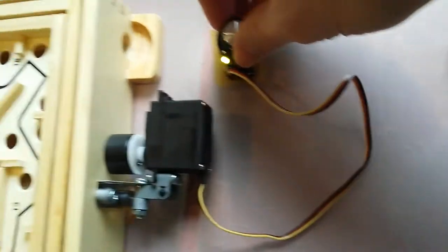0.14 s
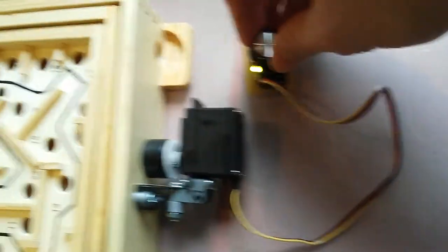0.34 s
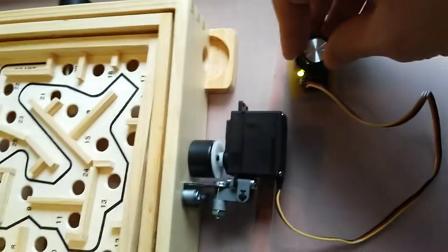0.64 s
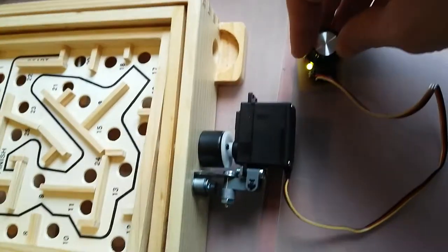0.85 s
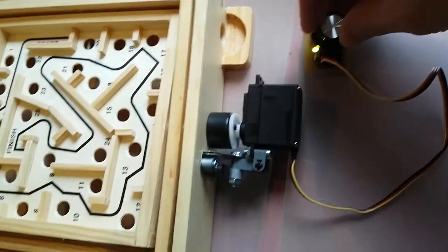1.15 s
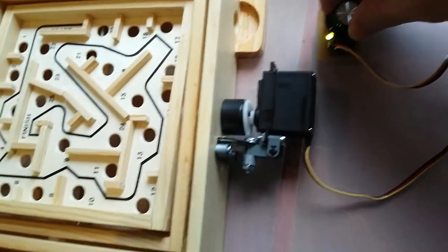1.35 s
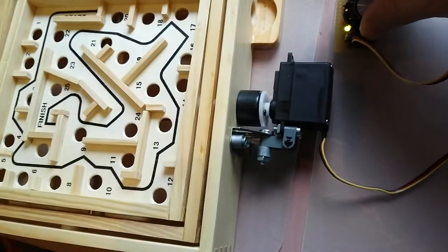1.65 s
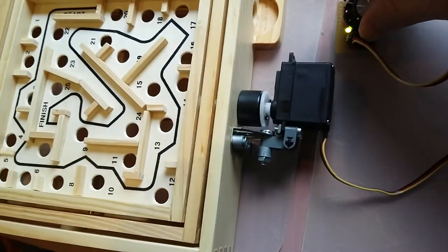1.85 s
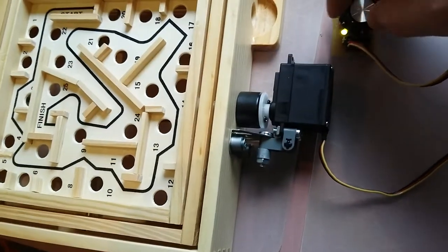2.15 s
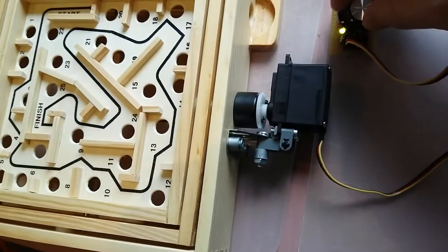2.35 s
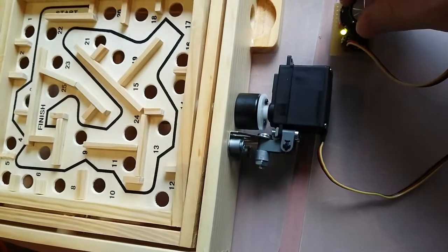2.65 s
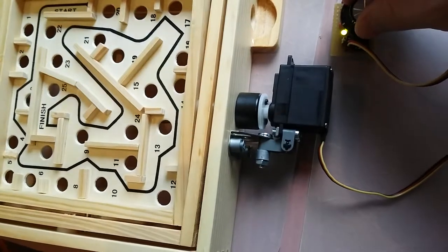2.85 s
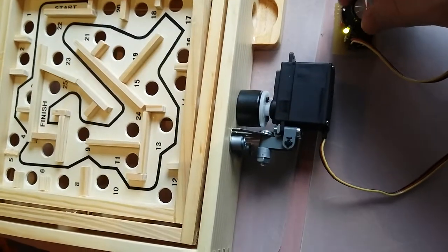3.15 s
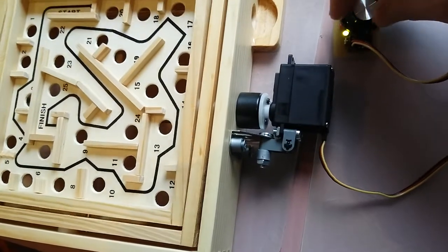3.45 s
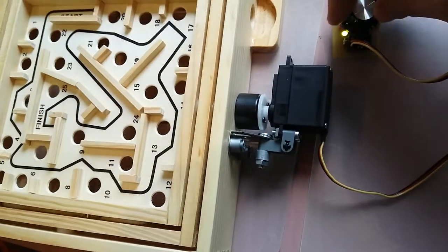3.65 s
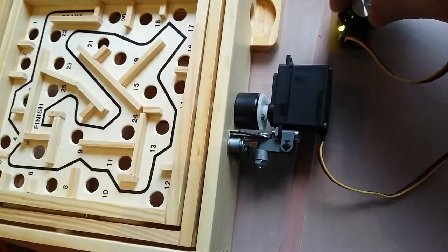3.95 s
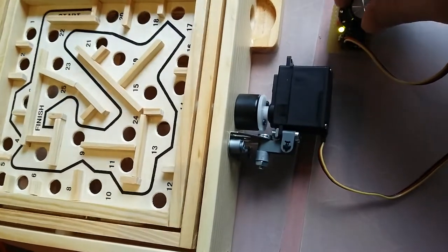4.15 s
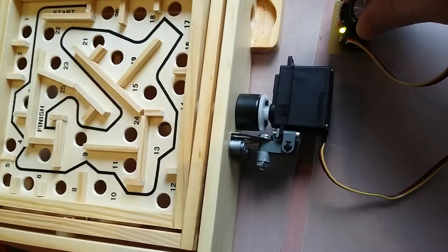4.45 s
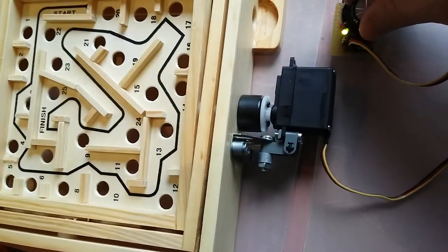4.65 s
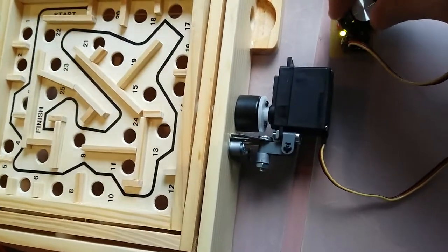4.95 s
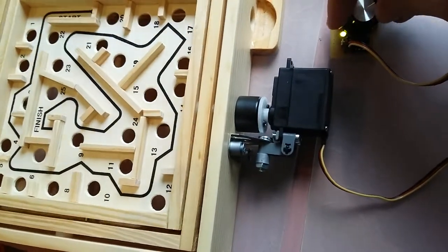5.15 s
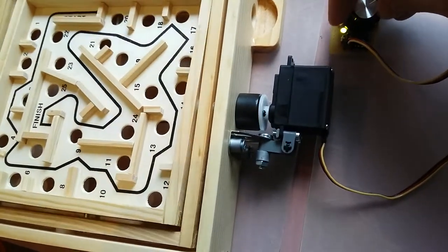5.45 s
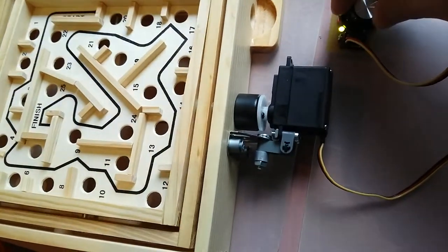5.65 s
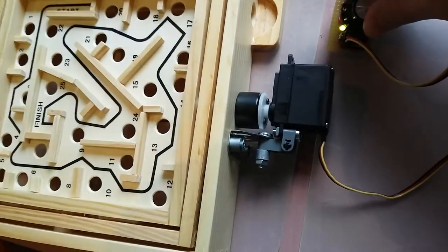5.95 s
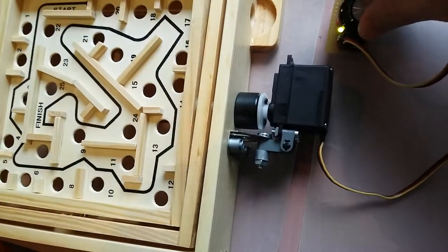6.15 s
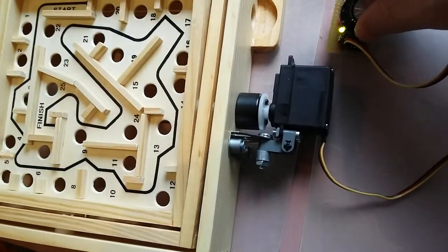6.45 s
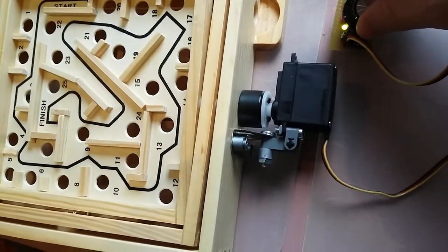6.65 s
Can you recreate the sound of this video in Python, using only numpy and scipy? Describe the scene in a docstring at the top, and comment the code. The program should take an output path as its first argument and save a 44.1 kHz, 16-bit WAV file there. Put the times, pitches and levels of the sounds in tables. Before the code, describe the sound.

Buzzy little motor gears whirr back and forth in brief swings, pausing, then growing busier and higher, ending in a scatter of small rattling twitches.

```python
"""A small geared servo tilts a wooden maze board to and fro as a hand turns its control knob, in a quiet room.
Its first gear pair whines at the tooth rate, loose teeth rattle in the plastic case, and fast gears hiss.
The drive pushes about fifty-one times a second, so the speed surges and the rougher sound throbs.
Short bursts of rattle are nudges as the servo hunts for its place. The board knocks softly on its frame
twice, ringing in low decaying tones. Filtered noise makes the room tone, and random echoes the room."""
import sys
import numpy as np
from scipy import signal
from scipy.fft import rfft, irfft, next_fast_len
from scipy.io import wavfile
from scipy.ndimage import uniform_filter1d

SR = 44100
rng = np.random.default_rng(int(sys.argv[2]) if len(sys.argv) > 2 else 0)


def wav_record(signal):
    """Record a signal, one row per channel, as 16-bit PCM in the file named by sys.argv[1]."""
    frames = np.transpose(np.atleast_2d(signal))
    bounded = np.clip(frames, -1, 1)
    # unit amplitude maps onto the largest positive 16-bit level
    quanta = np.round(bounded * 32767).astype(np.int16)
    wavfile.write(sys.argv[1], SR, quanta)


N = 299871  # length in samples
EDGE_HZ = 15680  # top of the recorded band


def gain_of(db):
    """Turns decibels into a gain."""
    return 10 ** (np.asarray(db) / 20)


def evened(x):
    """Scales to an rms (average strength) of 1."""
    return x / np.sqrt(np.mean(x ** 2) + 1e-20)


def read(points, hz):
    """Reads a table between its rows, along a logarithmic frequency axis."""
    f, value = np.transpose(points)
    return np.interp(np.log(hz + 1), np.log(f + 1), value)


def add(mix, s, sound):
    """Mixes a sound in at s seconds, cutting off what runs past the end."""
    part = mix[round(s * SR):][:len(sound)]
    part += sound[:len(part)]


def drift(length, hz):
    """Random wandering with an rms of about 1, no faster than about hz."""
    noise = rng.standard_normal(length + 4096)
    slow = signal.lfilter(*signal.butter(2, hz, fs=SR), noise)
    return evened(slow)[4096:]  # skip the start of the filter


def case_db(hz):
    """Each resonance of case and bracket lifts the colour around its own frequency."""
    # Each row: frequency in Hz, width in Hz, lift in dB before any weighting.
    resonances = [(1090, 63, 0.5), (1620, 104, 5), (2337, 108, 11), (2897, 206, 11.5), (3983, 155, 6),
                  (4876, 246, 10), (5235, 244, 10), (5720, 360, 0.5), (6920, 420, 6.5), (9140, 1400, 3.5),
                  (13050, 660, 12)]
    return sum(db / (1 + (2 * (hz - f) / width) ** 2) for f, width, db in resonances)


def ring_of(colour):
    """How the case rings after one tooth tap of a given colour: nothing sounds before the tap."""
    hz = abs(np.fft.fftfreq(8192, 1 / SR))
    log_gain = np.log(gain_of(np.maximum(read(colour, hz) + case_db(hz), -100)))
    phase = -signal.hilbert(log_gain).imag  # minimum phase: the energy comes as early as it can
    ring = np.fft.ifft(np.exp(log_gain + 1j * phase)).real[:2048]
    return ring / np.linalg.norm(ring)


def taps(length):
    """Loose teeth strike densely at random, some harder, in clumps."""
    harder = np.minimum(rng.exponential(1, length), 5)
    size = gain_of(1.8 * harder + 1.4 * drift(length, 120))
    struck = rng.random(length) < 14000 / SR  # about 14000 taps a second
    return evened(size * struck * rng.choice([-1., 1.], length))


def evenness(t):
    """Clean share and speed surge: rough running, easing into each steady stretch and out of it."""
    # Stretches where the gears settle. Each row: start in seconds, end in seconds,
    # clean share from 0 to 1, surge of speed in each push as a share.
    steady = [(.44, .56, .55, .05), (.63, .83, .74, .014), (1.56, 1.84, .68, .045), (2.58, 2.95, .5, .04),
              (3.58, 3.7, .66, .02), (3.76, 3.84, .8, .008), (4.06, 4.15, .45, .05), (4.24, 4.3, .6, .03),
              (4.4, 4.48, .52, .035), (5.17, 5.6, .85, .004), (5.82, 6.08, .7, .009)]
    rough_clean, rough_surge, settle_s = .18, .045, .08
    a, b, clean, surge = np.transpose(steady)[:, :, None]
    settled = np.clip(np.minimum(t - a, b - t) / settle_s + 1, 0, 1)
    settled = settled / np.maximum(settled.sum(0), 1)  # shares where stretches overlap
    clean_now = rough_clean + (settled * (clean - rough_clean)).sum(0)
    surge_now = rough_surge + (settled * (surge - rough_surge)).sum(0)
    return clean_now, surge_now


def tooth_whine(hz, turns, surge):
    """Harmonics of the tooth rate: each flutters, and beats once a turn of the uneven pinion."""
    # Starting strength of harmonics 1 to 9, in dB.
    tooth_shape_db = [2, 1, 1.5, 0, 5.5, 5, -3, 1.5, -9.5]
    # Colour of the whine. Each row: frequency in Hz, amount added to a harmonic there in dB.
    whine_colour = [(700, -17.5), (1050, -9), (1550, 0), (2050, -7), (2880, -1), (3350, -6.5), (4000, 2.5),
                    (5100, 4.5), (6000, -6), (7500, -11), (12000, -17)]
    pinion_teeth = 10
    shaft = 2 * np.pi * turns / pinion_teeth
    whine = np.zeros(len(hz))
    for k, shape_db in enumerate(tooth_shape_db, start=1):
        flutter_db = (2.5 + 15 * surge) * drift(len(hz), 50)
        db = shape_db + read(whine_colour, k * hz) + 0.73 * case_db(k * hz) + flutter_db
        db -= 22.0 * k * surge  # uneven running weakens the upper harmonics most
        beat = 1 + 0.28 * np.cos(shaft + 2 * np.pi * rng.random())
        tone = np.cos(2 * np.pi * (k * turns + rng.random()))
        whine += gain_of(db) * beat * (k * hz < EDGE_HZ) * tone
    return whine / np.sqrt(uniform_filter1d(whine ** 2, 4000) + 1e-20)  # keep the strength near 1


def later_gears(hz, turns):
    """Slower gear meshes hum where they cross a resonance of the bracket."""
    # Each row: multiple of the tooth rate, level in dB before its random flutter,
    # resonance in Hz, width in Hz.
    slow_meshes = [(.31, -22, 458, 124), (.69, -13, 1250, 114)]
    hum = np.zeros(len(hz))
    for multiple, db, peak_hz, width in slow_meshes:
        near = 1 / (1 + (2 * (multiple * hz - peak_hz) / width) ** 2)
        flutter_db = 5.0 * drift(len(hz), 68)
        hum += near * gain_of(db + flutter_db) * np.cos(2 * np.pi * multiple * turns)
    return hum


def swing(rows, usual_hiss_db, rattle_ring, hiss_ring):
    """One tilt: whine, rattle and hiss follow the tooth rate and throb with the pushes of the drive."""
    pushes_per_s, usual_hz = 50.9, 1200
    hiss_db_per_octave, hiss_per_db = 14.5, 0.68  # hiss grows with speed and with loudness
    s, *columns = np.transpose(rows)
    t = np.arange(s[0], s[-1], 1 / SR)
    rate_hz, level_db = (np.interp(t, s, c) for c in columns)
    clean, surge = evenness(t)

    pushes = pushes_per_s * t + 0.633
    number = (pushes // 1 - pushes[0] // 1).astype(int)
    strength = rng.standard_normal(number[-1] + 1)[number]  # no two pushes are alike
    # Speed climbs in each push, then sags.
    climb = uniform_filter1d(2 * (pushes % 1) - 1 + .5 * strength, 60)
    hz = rate_hz * (1 + surge * climb + .003 * drift(len(t), 300))
    turns = np.cumsum(hz) / SR  # counts teeth passed

    whine = tooth_whine(hz, turns, surge) + later_gears(hz, turns)
    gate = 1 + 0.47 * np.cos(2 * np.pi * turns)  # taps are stronger where teeth meet
    rattle = signal.oaconvolve(taps(len(t)) * gate, rattle_ring)[:len(t)]
    hiss = signal.oaconvolve(taps(len(t)) * gate, hiss_ring)[:len(t)]
    hiss_db = usual_hiss_db + hiss_db_per_octave * np.log2(rate_hz / usual_hz)
    hiss_db += hiss_per_db * (level_db - max(level_db))
    gears = np.sqrt(clean) * whine + np.sqrt(1 - clean) * rattle + gain_of(hiss_db) * hiss

    throb_db = 2.4 * (1 - clean) * np.cos(2 * np.pi * (pushes - .55))
    edge = np.clip(np.minimum(t - t[0], t[-1] - t) / 0.0033, 0, 1)  # short fades at both ends
    return s[0], gain_of(level_db + throb_db) * gears * edge


def ports(x, depth):
    """The two microphone ports hear the servo with their own delay and shading."""
    # Each row: frequency in Hz, radians by which left leads.
    lead = [(1000, 1), (2400, 0.99), (2800, -2), (3200, -2), (3500, 1.5), (4100, 0.5), (4600, -1.5),
            (5000, -2.5), (5900, -7), (6300, -0.5), (8600, -9), (9600, 1.14)]
    # Each row: frequency in Hz, left minus right in dB before scaling by depth.
    lean = [(1000, 3.5), (2300, -2), (2900, -10.5), (3500, -8.5), (4300, -2), (4900, 10.5), (5500, 16),
            (6200, 10.5), (7600, 4.5), (9600, 0), (13000, -3.5)]
    size = next_fast_len(N + 4096)
    hz = np.fft.rfftfreq(size, 1 / SR)
    half = gain_of(depth * read(lean, hz) / 2) * np.exp(.5j * read(lead, hz))
    return irfft(rfft(x, size) * np.array([half, 1 / half]), size)[:, :N]


def room(x):
    """Sparse echoes of random sign, each band dying at its own speed, unlike at the two ports."""
    # Each row: frequency in Hz, time to fade by 60 dB in seconds.
    fade_times = [(500, 0.46), (4000, .13), (10000, 0.22)]
    sparse = np.zeros((2, SR // 2))
    starts = np.arange(150, SR // 2 - 20, 20)
    at = starts + rng.integers(0, 20, (2, len(starts)))
    np.put_along_axis(sparse, at, rng.choice([-1., 1.], at.shape), 1)
    hz, t, z = signal.stft(sparse, SR, nperseg=256)
    fade = gain_of(-60 * t / read(fade_times, hz)[:, None])
    tail = signal.istft(z * fade, SR, nperseg=256)[1]
    return signal.fftconvolve(x[None], tail / np.linalg.norm(tail[0]), axes=1)[:, :N]


def air():
    """Room tone: random short-time spectra with faint drifting patches."""
    # Colour of the room tone. Each row: frequency in Hz, relative level in dB per Hz.
    air_colour = [(15, -35), (25, -4.5), (53, -12), (82, -6.5), (126, -9.5), (221, -12), (253, -7.5),
                  (297, -15), (410, -13), (509, -23.5), (1620, -27.5), (3530, -34.5), (6050, -36.5),
                  (7110, -47), (15500, -46.5)]
    # Each row: frequency in Hz, likeness of left and right (1 is identical).
    likeness = [(60, 0.82), (180, 0.74), (550, 0.37), (1650, 0.24), (4970, 0.28), (15000, 0.065)]
    air_db = -61
    frames, hz = N // 512 + 5, np.fft.rfftfreq(2048, 1 / SR)
    a, b, c, d, patches = rng.standard_normal((frames, 1025, 5)).T
    patches = evened(uniform_filter1d(uniform_filter1d(patches, 8, 0), 8, 1))
    same = read(likeness, hz)[:, None]
    left = a + 1j * b
    right = same * left + np.sqrt(1 - same ** 2) * (c + 1j * d)
    z = np.array([left, right]) * gain_of(read(air_colour, hz)[:, None] + 2.28 * patches)
    noise = signal.istft(z, nperseg=2048, noverlap=1536)[1][:, :N]
    return gain_of(air_db) * evened(noise)


def nudge(level_db, length, ring):
    """The rotor jerks: a burst of rattle that starts fast and coasts out."""
    t = np.arange(round(.15 * SR)) / SR
    rise = 1 - np.exp(-t / 0.0055)
    coast = 1 / (1 + np.exp((t - length) / 0.013))
    return gain_of(level_db - 13.0) * signal.oaconvolve(taps(len(t)) * rise * coast, ring)


def knock(level_db):
    """The board meets its frame: a soft blow rings its low modes."""
    # Each row: frequency in Hz, relative level in dB, time to fade by 60 dB in seconds.
    board_modes = [(131, 0, .16), (233, -9, .1), (390, -16, .06)]
    t = np.arange(round(.3 * SR)) / SR
    modes = sum(gain_of(db - 60 * t / t60) * np.sin(2 * np.pi * hz * t) for hz, db, t60 in board_modes)
    return gain_of(level_db) * modes * np.minimum(t / .012, 1)  # 12 ms soft start


def scene():
    """Servo at the two ports and in the room, board knocks and room tone."""
    # One table a swing. Each row: time in seconds, tooth rate in Hz before surges, loudness in dB before
    # throb and room mix. Two close rows mark where the load makes the speed drop at once.
    swings = [
        [(0.0, 688, -49.5), (0.052, 690, -50), (0.104, 665, -68), (0.19, 706, -67.5), (0.27, 690, -79)],
        [(0.36, 687, -55.5), (0.406, 792, -49.5), (0.476, 873, -46.5), (0.56, 898, -45.5), (0.6, 988.5, -44),
         (0.654, 1094, -43.5), (0.658, 970, -47), (0.69, 1005, -43), (0.734, 1102, -43), (0.738, 971, -49),
         (0.772, 1055, -39), (0.792, 1020, -47.5), (0.806, 1009, -38), (0.89, 1029, -76)],
        [(1.42, 799, -55.5), (1.47, 872.4, -46), (1.518, 1120, -51), (1.532, 1175, -43), (1.8, 1215, -38),
         (1.848, 1175, -47), (1.92, 1127, -40.5), (1.98, 981, -44), (2.03, 978, -60), (2.066, 1000, -52.5),
         (2.19, 980, -90)],
        [(2.45, 966, -77), (2.49, 970, -57), (2.566, 1144, -46.5), (2.656, 1034, -46), (2.69, 1207, -44.5),
         (2.83, 875, -43), (2.876, 1000, -42), (2.946, 845, -47.5), (3.022, 870, -50), (3.04, 880, -69)],
        [(3.27, 856, -53), (3.344, 812, -49), (3.4, 891, -42.5), (3.425, 930, -85)],
        [(3.432, 976, -51), (3.45, 1045, -42.5), (3.506, 1388, -44.5), (3.572, 1495, -43), (3.586, 1385, -42.5),
         (3.722, 1450, -42), (3.758, 1406, -41), (3.762, 1333, -39.5), (3.814, 1309, -41.5),
         (3.818, 1190, -43.5), (3.884, 1056, -42.5), (3.955, 978, -71)],
        [(4.012, 1166, -51.5), (4.1, 1159, -46), (4.165, 953, -43), (4.205, 1172, -42), (4.292, 1489, -40),
         (4.335, 1270, -43.5), (4.394, 1511, -41), (4.504, 1383, -42), (4.584, 1128, -42.5), (4.648, 1039, -54),
         (4.657, 1000, -43.5), (4.7, 950, -49)],
        [(4.86, 1047, -59.5), (4.918, 1097, -52.5), (4.928, 1150, -44.5), (4.944, 1287, -46),
         (5.012, 1412, -43), (5.082, 1732, -44), (5.19, 1615, -41), (5.266, 1538, -41.5), (5.366, 1304, -41),
         (5.43, 1250, -40.5), (5.562, 1196, -40), (5.585, 1182, -69)],
        [(5.682, 1057, -47), (5.748, 1200, -40.5), (5.786, 1230, -37.5), (5.83, 1250, -39.5),
         (5.9, 1470, -37.5), (6.024, 1726, -37.5), (6.07, 1809, -38.5), (6.154, 1414, -39), (6.192, 1384, -45),
         (6.21, 1360, -42), (6.3, 1046, -49.5), (6.36, 1017, -53)],
    ]
    # One value a swing: hiss at the usual speed and full loudness, in dB relative to the gears.
    usual_hiss = [-20, -16.5, -14, -10, -7.5, -13, -12, -15, -15.5]
    # Colours of the taps before the case lifts them. Each row: frequency in Hz, relative level in dB per Hz.
    rattle_colour = [(240, -55.5), (400, -17), (623, -25.5), (1070, -18), (1470, -15.5), (2330, -17),
                     (3360, -17), (5070, -5.5), (5910, -22), (13100, -42.5), (15500, -36.5)]
    hiss_colour = [(3530, -39.5), (6000, 1.5), (7380, 4), (8380, -13), (9480, 2), (11000, -13.5),
                   (13000, -13), (15500, -20)]
    # Short pushes of the drive. Each row: start in seconds, loudness setting in dB,
    # time until the coasting fade is halfway in seconds.
    nudges = [(0.122, -31.5, 0.0082), (0.283, -33.5, 0.031), (0.904, -59.5, 0.033), (0.955, -61.5, 0.026),
              (0.987, -61, 0.03), (1.028, -63, 0.031), (1.168, -57, 0.088), (1.3066, -49.5, 0.068),
              (2.17, -47.5, 0.01), (2.389, -50, 0.02), (3.0524, -34, 0.015), (3.11, -45.5, 0.02),
              (3.209, -38.5, 0.0072), (3.25, -44, 0.016), (3.955, -42, 0.011), (4.004, -30, 0.008),
              (4.727, -31.5, 0.0064), (4.766, -38, 0.009), (5.596, -32.5, 0.029), (6.322, -42, 0.015),
              (6.3785, -33, 0.012), (6.428, -45, 0.02), (6.483, -40.5, 0.024), (6.493, -38.5, 0.014),
              (6.553, -46, 0.05), (6.598, -36, 0.029), (6.654, -34.5, 0.023), (6.715, -35.5, 0.053),
              (6.743, -40, 0.014)]
    # Each row: start in seconds, loudness setting in dB.
    knocks = [(.822, -51), (1.19, -59)]
    # How far the microphone is turned aside. Each row: time in seconds, share from 0 to 1.
    turned_aside = [(0, 0), (.5, 0.3), (.9, 1), (1.4, 0.32), (2.8, 0.01), (3.2, 0.56), (3.9, 0.05),
                    (4.5, 0.14), (5.3, 0.35), (6.2, 0), (6.6, 0.62)]

    servo, board = np.zeros(N), np.zeros(N)
    rattle_ring, hiss_ring = ring_of(rattle_colour), ring_of(hiss_colour)
    for rows, hiss_db in zip(swings, usual_hiss):
        add(servo, *swing(rows, hiss_db, rattle_ring, hiss_ring))
    for s, level_db, length in nudges:
        add(servo, s, nudge(level_db, length, rattle_ring))
    for s, level_db in knocks:
        add(board, s, knock(level_db))
    turned = np.interp(np.arange(N) / SR, *np.transpose(turned_aside))
    # Turning aside deepens the shading between the ports.
    direct = (1 - turned) * ports(servo, 0.26) + turned * ports(servo, 2.06)
    return gain_of(-0.5) * direct + gain_of(-5.5) * room(servo) + board + air()


def record(dry):
    """The microphone drops the deepest bass, then the recorder cuts the highest treble."""
    thin = signal.sosfilt(signal.butter(8, 38, "high", fs=SR, output="sos"), dry)
    band_limit = signal.firwin(1023, EDGE_HZ, window=("kaiser", 10), fs=SR)
    return signal.oaconvolve(thin, band_limit[None], "same")


dry = scene()
out = record(dry)
wav_record(out)
```